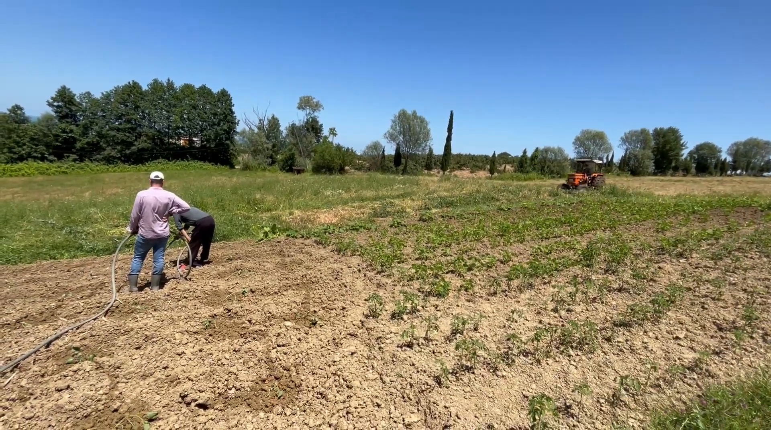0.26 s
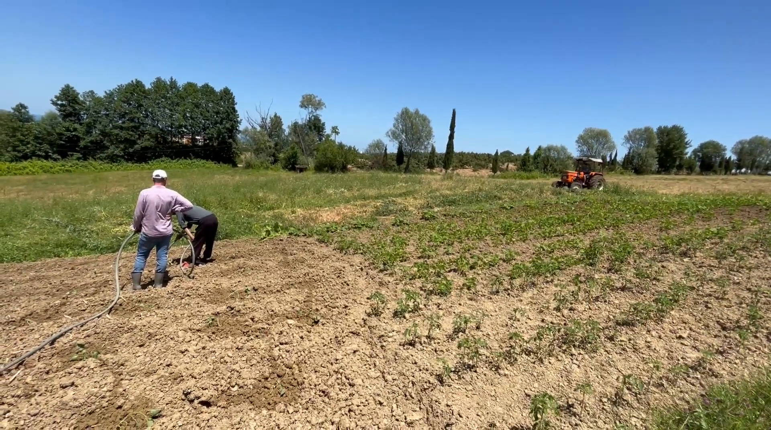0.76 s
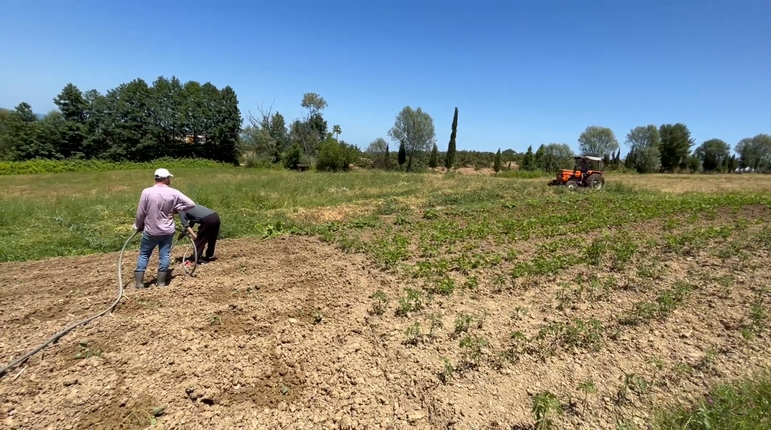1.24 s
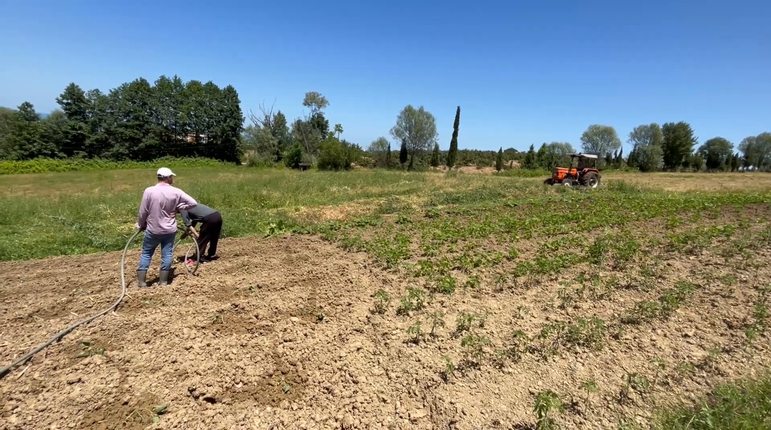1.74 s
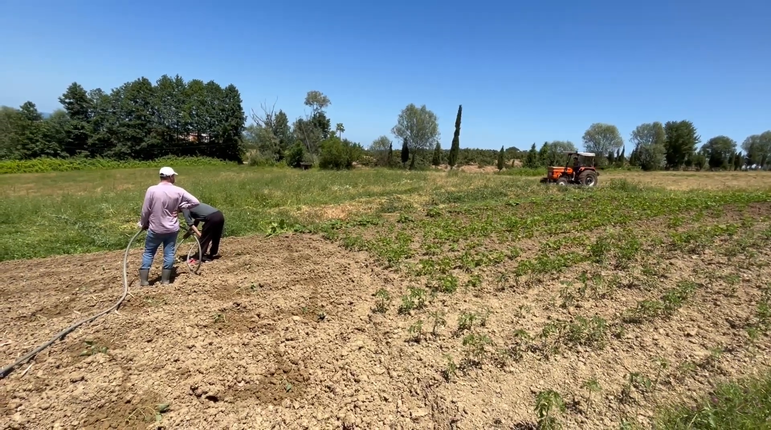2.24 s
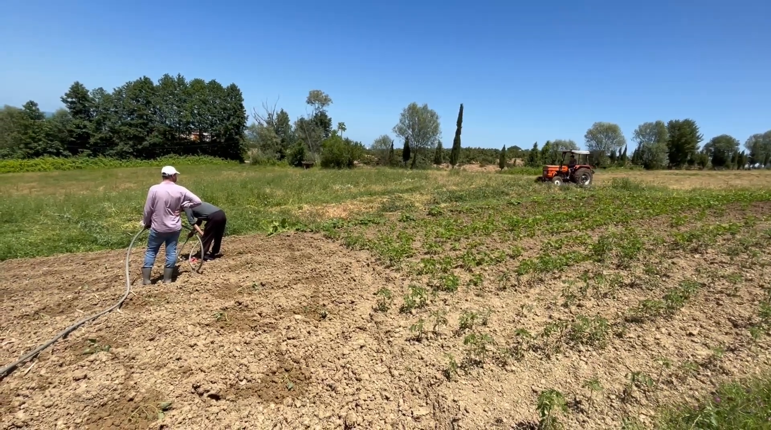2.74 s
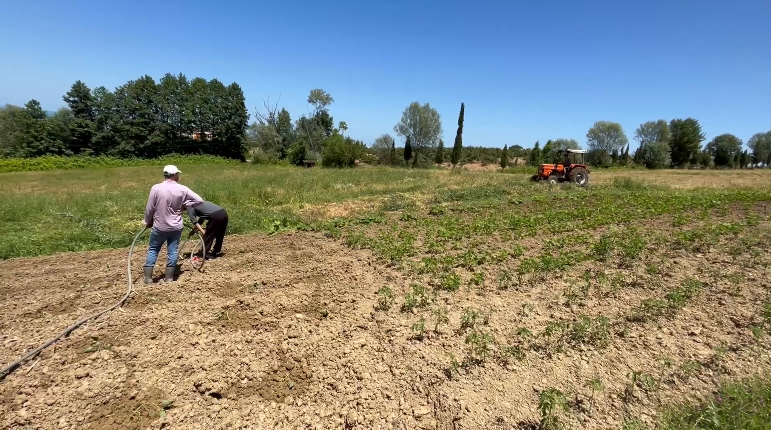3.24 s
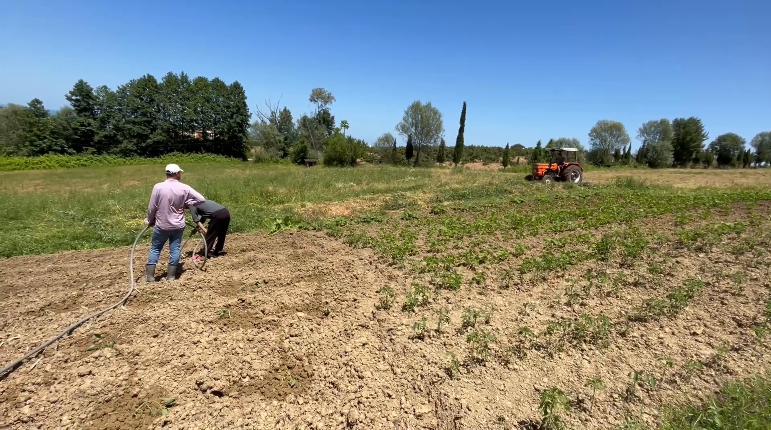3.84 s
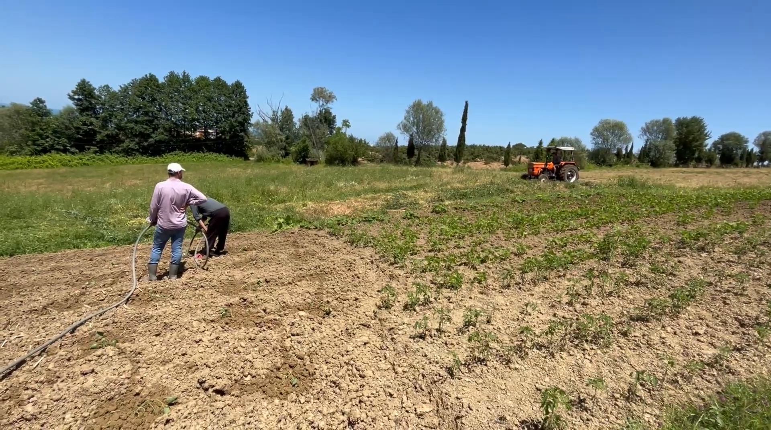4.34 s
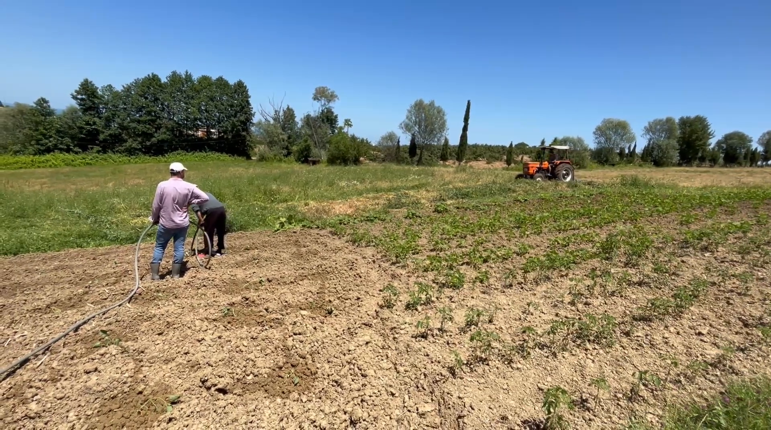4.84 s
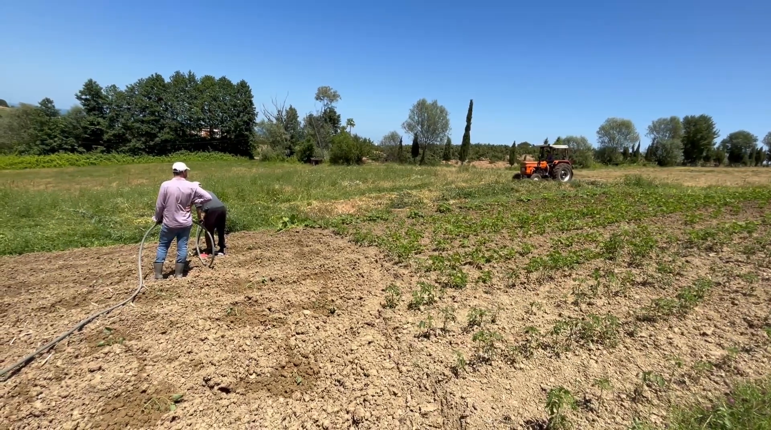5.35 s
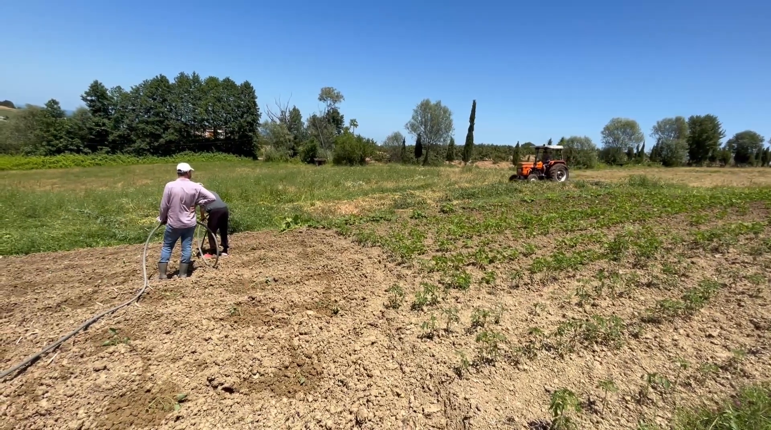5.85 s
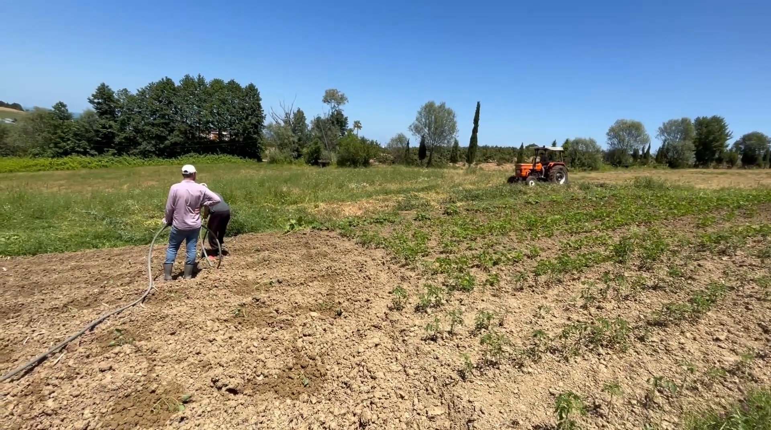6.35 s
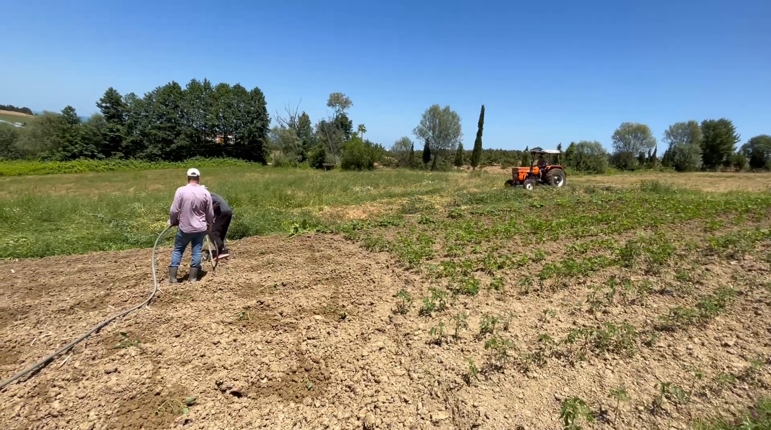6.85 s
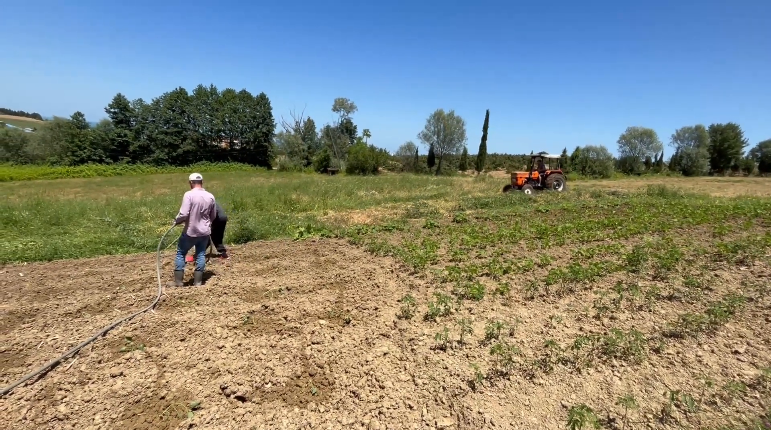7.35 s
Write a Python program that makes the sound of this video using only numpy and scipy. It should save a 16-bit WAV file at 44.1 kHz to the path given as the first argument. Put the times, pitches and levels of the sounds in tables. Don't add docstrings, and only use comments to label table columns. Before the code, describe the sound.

Throughout, a three-cylinder diesel tractor pulls a mower some forty metres away across an open field, heard on a handheld stereo phone. Its fast, even exhaust chug, about 33 beats a second, forms a low drone under a dense, rough mid-range rattle of block and panels, a thin wavering gear whine and faint grass swish; the treble is slightly grainy. From 1.5 to 2.1 s wind gusts thump, low and ragged, mostly on the left. The bass then drops out and returns around 3.6 s. From there small stones knock dully under the mower deck, scattered to the end, while the engine slows slightly and the whine grows stronger in pulls. From 5.3 s gusts buffet again, strongest near 6 s, and the machine works harder. After 6.6 s the bass thins once more, with a few lighter wind bumps, the tractor still running at the end.

```python
import sys
import numpy as np
from scipy import signal
from scipy.fft import rfft, irfft, next_fast_len
from scipy.io import wavfile
from scipy.ndimage import uniform_filter1d, map_coordinates

SR = 44100
rng = np.random.default_rng(int(sys.argv[2]) if len(sys.argv) > 2 else 0)


def invert_db(x):
    u = np.asarray(x, float) / 20
    return 10 ** u


def waveform_to_disk(signal):
    frames = np.transpose(np.atleast_2d(signal))
    scaled = np.clip(frames, -1, 1) * 32767
    samples = np.round(scaled).astype(np.int16)
    wavfile.write(sys.argv[1], SR, samples)


N = 334719
T = np.arange(N) / SR
SIZE = next_fast_len(N)
HZ = np.maximum(np.arange(SIZE // 2 + 1) * SR / SIZE, 1)


def curves(table):
    s, *columns = np.transpose(table)
    return [np.interp(T, s, c) for c in columns]


def over_hz(table):
    hz, *columns = np.transpose(table)
    return [np.interp(np.log(HZ), np.log(hz), c) for c in columns]


def unit(x):
    return x / np.sqrt(np.mean(x ** 2))


def walk(rate_hz):
    k = int(SR / rate_hz)
    steps = np.repeat(rng.standard_normal(N // k + 1), k)
    return unit(uniform_filter1d(uniform_filter1d(steps, k), k)[:N])


def coloured(gain):
    return unit(irfft(gain * rfft(rng.standard_normal(SIZE)), SIZE)[:N])


def swell(start_s, length_s, attack_s, release_s):
    rise = (T - start_s) / attack_s + 1
    fall = 1 - (T - start_s - length_s) / release_s
    return np.clip(np.minimum(rise, fall), 0, 1)


# (start [s], length [s], left level [dB], right level [dB])
GUSTS = [(0.873, 0.12, -57.5, -55), (1.48, 0.26, -43, -52), (1.854, 0.16, -44.5, -38),
         (2.178, 0.17, -46.5, -48), (2.95, 0.3, -70, -54.5), (3.6, 0.17, -55, -54.5),
         (4.743, 0.36, -60, -51), (5.507, 0.36, -44, -46), (5.956, 0.31, -37.5, -41.5),
         (6.493, 0.049, -46, -54), (6.851, 0.068, -42, -52), (7.109, 0.44, -44, -53)]
# (frequency [Hz], level [dB])
RUSH = [(25, -11), (50, -3), (90, 0), (160, -1), (240, -7), (330, -14), (450, -22), (600, -40)]
# (time [s], peak level [dB], pitch [Hz], port [0 left, 1 right])
THUMPS = [(0.926, -22, 126, 1), (1.475, -13, 107, 0), (1.477, -20, 95, 1), (1.493, -13.5, 98, 0),
          (1.534, -12, 114, 0), (1.59, -20, 110.2, 0), (1.655, -20, 130, 0), (1.718, -15.5, 90, 0),
          (1.764, -12, 89, 0), (1.839, -16, 126, 0), (1.865, -15.5, 170.5, 0), (1.903, -22, 151, 0),
          (1.942, -10, 84.5, 0), (5.552, -24, 90.5, 0), (5.624, -15.5, 77.56, 0), (6.006, -19.5, 79.5, 0),
          (6.153, -14.5, 150, 0), (6.168, -15, 90, 0), (6.299, -23, 85, 0), (6.53, -22, 90.6, 0),
          (1.617, -17, 104.9, 0), (1.696, -18, 142, 0), (1.744, -16, 128, 0), (1.82, -15.5, 130, 0),
          (1.853, -18, 113.2, 1), (1.927, -19, 152.2, 1), (1.963, -7, 106, 0), (1.993, -13.5, 126, 0),
          (1.993, -13.5, 133, 1), (2.019, -12, 149, 0), (2.053, -13, 143, 0), (2.107, -19, 189.1, 0),
          (5.279, -14.5, 76, 0), (5.604, -22.5, 112, 0), (5.725, -17, 134, 0), (5.814, -14.5, 99, 0),
          (5.866, -33, 100.5, 0), (5.972, -14.5, 142.6, 0), (6.077, -10, 105, 0), (6.139, -13.5, 141, 0),
          (6.169, -25, 106, 1), (6.243, -16, 92, 0), (6.272, -21, 96, 0), (6.835, -18, 141, 0),
          (7.194, -20.5, 172.1, 0), (7.448, -20, 135, 0), (1.957, -20, 350, 0), (1.985, -25, 400, 0),
          (2.026, -24, 334, 0)]


def wind():
    attack_s, release_s = 0.13, 0.14
    spread_cycles, glide_per_cycle = 0.84, 0.15
    breeze = invert_db(np.array([[-46], [-51.5]]))
    gusts = sum(np.outer(invert_db(np.array(db)), swell(s, length, attack_s, release_s))
                for s, length, *db in GUSTS)
    rush_gain = invert_db(over_hz(RUSH)[0])
    out = np.array([gain * invert_db(4.4 * walk(30) + 0.5) * coloured(rush_gain) for gain in gusts + breeze])
    t = np.arange(-2000, 2000) / SR
    for s, db, hz, port in THUMPS:
        turn, small_turn = rng.random(2)
        puff = np.exp(-.5 * (t * hz / spread_cycles) ** 2)
        burst = np.cos(2 * np.pi * (hz * t * (1 - glide_per_cycle * hz * t) + turn))
        burst += .3 * np.cos(2 * np.pi * (1.9 * hz * t + small_turn))
        i = int(s * SR) - len(t) // 2
        out[port, i:i + len(t)] += invert_db(db - 4.0) * (puff * burst)[:N - i]
    out[1] += .12 * out[0]
    return out


# (start [s], length [s], closing [s], opening [s], depth [dB])
FILTER_SHUT = [
    (0.843, 0.24, 0.092, 0.089, -1),
    (1.2, 0.22, .1, .1, 2),
    (2.065, 1.5, 0.045, 0.32, -12),
    (4.123, 0.31, 0.29, 0.11, -3),
    (4.85, 0.26, 0.27, 0.12, -1.5),
    (5.244, 0.43, .1, .05, 3),
    (5.79, 0.22, 0.13, 0.12, -2.5),
    (6.62, 1.21, 0.17, 0.11, -10),
]


def wind_filter_db():
    return sum(db * swell(s, length, closing, opening) for s, length, closing, opening, db in FILTER_SHUT)


# (frequency [Hz], level [dB], rise as the tractor turns [dB/s])
SHELLS = [(291.8, -52.5, 1), (337.3, -53, -1), (1171, -52, -1.5), (1050, -62, 1.1)]


def shells():
    out = 0
    for hz, db, rise_db_s in SHELLS:
        level_db = db + rise_db_s * (T - T[-1] / 2) + 4.1 * walk(7)
        out = out + invert_db(level_db) * np.sin(2 * np.pi * np.cumsum(hz * (1 + .008 * walk(5))) / SR)
    return out


# (start [s], length [s], gain [dB])
MESH = [
    (3.75, 0.55, 5),
    (4.55, 0.6, 5.5),
    (5.701, .4, 3),
    (6.65, .8, 3.5),
]


def whine():
    level_db, rise_db_s, waver_db, edge_s = -60 + 4.5, .45, 1.8, 0.11
    tone = np.sin(2 * np.pi * np.cumsum(569 + 1.0 * walk(4) + 2.0 * walk(40)) / SR)
    pull_db = sum(db * swell(s, length, edge_s, edge_s) for s, length, db in MESH)
    balance_db = np.array([[.8], [-.8]])
    return invert_db(level_db + rise_db_s * T + pull_db + waver_db * walk(13) + balance_db) * tone


# (time [s], peak level [dB], ring [Hz])
KNOCKS = [(0.999, -27, 825), (1.81, -30.5, 1210), (3.658, -39, 892), (3.714, -33, 942), (3.847, -32, 927),
          (4.045, -26, 1157), (4.475, -26.5, 1130), (5.131, -22, 1162), (5.229, -29, 802),
          (5.312, -29.5, 1050), (5.382, -28, 890), (5.865, -29, 897), (5.907, -26, 1110),
          (6.008, -29, 1030), (6.173, -28, 880), (6.445, -25.5, 813), (6.615, -33.5, 821),
          (7.139, -26, 1500), (7.385, -26, 1063)]


def knocks():
    decay_s = .008
    out, t = np.zeros(N), np.arange(2000) / SR
    for s, db, hz in KNOCKS:
        i = int(s * SR)
        out[i:i + len(t)] += invert_db(db) * np.exp(-t / decay_s) * np.sin(2 * np.pi * hz * t)
    return out


# (time [s], level [dB])
LOAD = [(0, -36), (1.3, -36), (2, -35.5), (2.8, -36), (3.8, -35.5), (4.5, -35), (5.2, -34.5), (5.7, -34.5),
        (5.95, -33.5), (6.4, -34.5), (7.0, -35), (7.59, -34)]
LOAD_SHARES = [0.77, 1.25, 0.077, 1.3]
# (start [s], length [s], load column [index], gain [dB])
LURCHES = [
    (0.7, 0.18, 0, 5.5),
    (1.38, 1.287, 0, -4.5),
    (5.3, 0.1, 0, -3),
    (7.8, 0.2, 0, 4),
    (6.3, 0.59, 0, 2),
    (1.75, 4.8, 2, -1),
    (6.8, 0.53, 2, -5.5),
    (4.2, 0.33, 1, -0.5),
]
# (centre [Hz], load column [index], swing once a cycle [dB], twice [dB],
# each firing [dB], flicker [dB], rise as it turns [dB/s])
PARTS = [(300, 0, .3, .3, .3, 1.5, .1), (500, 1, .3, .3, .3, .5, -.2), (700, 1, .5, .3, .5, .5, .4),
         (900, 1, .6, .2, .4, .5, -.2), (1150, 1, .5, .3, .4, .5, .1), (1550, 1, 1.3, 1.3, .6, .5, .2),
         (2050, 1, .6, .6, .3, .6, -.2), (2900, 2, .5, .2, .8, .8, .2), (4200, 3, .2, .1, .5, .8, 0),
         (6000, 3, .1, .1, .4, .7, 0), (8500, 3, .1, .1, .4, .6, .1), (11500, 3, .1, .1, .3, .8, .4)]
# (frequency [Hz], left level [dB], right level [dB],
# likeness [0-1], right lead [rad])
PORTS = [(247, -10, -11, 1, 0.01), (257, -13, -9, 1, 0.37), (286, 1.5, 1.5, 1, 0.018),
         (314, -5, -4.5, 1, 0.43), (317, -0.5, 1, 1, -0.49), (371, -8.5, -10, 1, -0.6),
         (400, -13.0, -9.5, 0.53, 0.6), (482, -9, -10.5, 0.85, -1), (520, -13, -11.5, 0.34, -1.7),
         (552, -7.5, -13.5, 0.73, 0.0), (579, -9.0, -10.5, 1, -0.27), (612, -14, -8, 0.36, -3.7),
         (636, -3.5, -12.5, 0.2, 1.2), (717, -1, -12, 0.8, 0.5), (764, -7.5, -9.0, 0.92, 0.82),
         (873, 1, -3.5, 0.87, 0.84), (996, -8, -8.0, 1, 1.44), (1050, -4, -5.5, 0.79, 0.6),
         (1130, -6, -4, 0.88, 0.45), (1177, -2, -6, 0.95, 0.15),
         (1290, -8.0, -10.5, 0.93, 0.6), (1405, -10.5, -14, 0.5, 1.7), (1500, -1.5, -9.5, 0.83, 1.7),
          (1638, -6.5, -9.5, 0.77, 1.8), (1772, -12, -15.5, 0.3, -0.2), (1856, -9.5, -11.5, 0.4, -0.8),
          (1877, -11.5, -9.5, 0.5, -2), (2130, -16.0, -14.5, 0.1, -1), (2185, -13, -7, 0.6, 1.2),
          (2325, -16.5, -15, 0.72, 3), (2400, -21.5, -28, 1, 3.5), (2520, -11, -13, 0.88, 3),
          (2630, -15, -14.5, 0.85, 0.9), (2906, -11.0, -8.5, 1, -1), (3210, -15.5, -19, 0.73, -2),
         (3540, -18.5, -15.5, 0.5, -2.5), (4080, -21, -21.5, 0.35, -6), (4580, -23, -26.5, 1, -5),
       (5400, -22, -25, 0.5, -6), (5790, -21.5, -25.5, 0.98, -3), (6250, -27, -24.0, 0, -2),
       (6670, -31.5, -26, 0.6, -5.5), (7000, -32.0, -37, 0.14, -6.5), (7800, -36.5, -37, 0.33, -5),
       (8800, -33, -33.5, 0.5, -9), (9430, -36.5, -30, 0.16, -7), (10720, -42, -39, 1, -11),
       (11200, -41.5, -36.5, 0.8, -6.5), (11300, -36, -34.5, 0.95, -4.5), (11700, -43, -42, 0.9, -6.5)]
# (time [s], right port delay [samples])
DRIFT = [(0, 0.054), (3.8, -0.55), (7.59, 0.71)]


def rattle(cycle):
    level_db, lurch_edge_s = -35.5 + 2.0, 0.13
    effort_db = curves(LOAD)[0]
    load_db = [share * (effort_db - effort_db.mean()) for share in LOAD_SHARES]
    for s, length, column, db in LURCHES:
        load_db[column] += db * swell(s, length, lurch_edge_s, lurch_edge_s)
    centres = np.log([part[0] for part in PARTS])
    direct = scattered = 0
    bump = walk(3.72)
    for k, (_, column, once_db, twice_db, firing_db, flicker_db, rise_db_s) in enumerate(PARTS):
        beat_db = .7 * once_db * np.cos(cycle) + .6 * twice_db * np.cos(2 * cycle)
        beat_db += 1.0 * firing_db * (np.cos(3 * cycle) + 0.22 * np.cos(6 * cycle))
        chance_db = .3 * bump + 1.6 * flicker_db * walk(9) + .5 * walk(25)
        shake = invert_db(load_db[column] + beat_db + rise_db_s * (T - T[-1] / 2) + chance_db)
        share = np.sqrt(np.interp(np.log(HZ), centres, np.arange(len(PARTS)) == k))
        direct = direct + share * rfft(shake * rng.standard_normal(N), SIZE)
        scattered = scattered + share * rfft(shake * rng.standard_normal(N), SIZE)
    left_db, right_db, alike, lead_rad = over_hz(PORTS)
    alike = np.clip(alike, 0, 1)
    right = alike * np.exp(1j * lead_rad) * direct + np.sqrt(1 - alike ** 2) * scattered
    edges = 1 / (1 + (140 / HZ) ** 6) / (1 + (HZ / 11900) ** 60)
    edges *= 1 + 0.48 * HZ / (HZ + 3000)
    spectra = edges * np.array([invert_db(left_db) * direct, invert_db(right_db) * right])
    left, right = irfft(spectra, SIZE)[:, :N]
    right = map_coordinates(right, [np.arange(N) - curves(DRIFT)[0]], mode="mirror")
    return invert_db(level_db) * unit(np.array([left, right]))


# (time [s], firing rate [Hz])
ENGINE = [(0, 33.77), (.33, 33.62), (.8, 34.7), (1.3, 33.8), (2.2, 33.25), (2.5, 32.76), (3.2, 33.2),
          (3.7, 32.47), (4.2, 33.24), (4.55, 31.8), (5.15, 32.4), (5.4, 31.34), (5.9, 32.18), (6.2, 32.2),
          (6.6, 31.67), (7.15, 32.2), (7.59, 32.1)]


def engine_cycle():
    return 2 * np.pi * np.cumsum(curves(ENGINE)[0]) / 3 / SR


# (multiple of the four-stroke cycle [1], level re 2nd tone [dB])
ORDERS_OF_CYCLE = [(3, -15), (4, -22), (5, -19), (7, -17), (8, -20), (10, -22), (12, -23)]
# (frequency [Hz], level [dB])
RUMBLE = [(20, -31), (35, -4.5), (60, 11), (100, -21), (130, 6.5), (200, -50)]


def exhaust(cycle, cut_db):
    second_db = -35 + cut_db + 1.3 * walk(4.41)
    third_db = -39.3 + .92 * cut_db + 1.3 * walk(3.44)
    tones = invert_db(second_db + 3 + 1.0 * walk(9)) * np.sin(6 * cycle + .25 * walk(7))
    tones += invert_db(third_db + 3 + 1.2 * walk(9)) * np.sin(9 * cycle + 1.5 + .25 * walk(7))
    for order, db in ORDERS_OF_CYCLE:
        tones += invert_db(second_db + db + 3.0 * walk(3)) * np.sin(order * cycle + .9 * walk(3))
    open_db = uniform_filter1d(second_db, SR // 8)
    rumble_gain = invert_db(over_hz(RUMBLE)[0])
    common, *own = [invert_db(open_db + db - 0.5 + 2.0 * walk(6.7)) * coloured(rumble_gain)
                    for db in (-13, -6, -10)]
    balance = invert_db(np.array([[1.2], [0.]]))
    return tones * balance + common + np.array(own)


def scene():
    cycle = engine_cycle()
    return wind() + shells() + whine() + knocks() + rattle(cycle) + exhaust(cycle, wind_filter_db())


# (frequency [Hz], mid level [dB], side level [dB])
FINENESS = [(300, 26, 18), (1290, 18, 14), (1640, 18, 18), (1980, 11, 14), (2200, 11, 10), (2450, 1, 10),
            (2710, 10, 3), (2970, 12, 8), (3270, 3, 9), (3620, 4, 5), (4000, 4, -3), (4440, 2, -1),
            (4900, 4, 5), (5430, 4, 8), (5990, -1, 4), (6590, 0, -5), (7230, -5.5, -5), (7920, -4.5, -7.5),
            (8610, -3, 0), (9300, 1, 1), (9990, 0, 3), (10680, -6.5, 0), (11370, -2.5, -9),
            (12050, -19, -40)]


def rounded(dry):
    hop, lead = 1024, 2048 - 280
    swing_db, bass_cost = 6.0, .1
    band_edges = [*range(0, 40, 4), *range(40, 96, 8), 96, 108, 120, 132, 144, 160, 176, 196,
                  216, 240, 264, 292, *range(320, 1024, 32)]
    pair = np.array([dry[0] + dry[1], dry[0] - dry[1]]) / 2
    pair = np.pad(pair, ((0, 0), (lead, 3 * hop)))
    count = pair.shape[1] // hop - 1
    basis = np.cos(np.pi / hop * np.outer(np.arange(2 * hop) + .5 + hop / 2, np.arange(hop) + .5))
    basis *= signal.windows.kaiser_bessel_derived(2 * hop, 4 * np.pi)[:, None] * np.sqrt(2 / hop)
    lines = pair[:, np.arange(count)[:, None] * hop + np.arange(2 * hop)] @ basis
    band = np.searchsorted(band_edges, np.arange(hop), "right") - 1
    centre = (np.bincount(band, np.arange(hop)) / np.bincount(band)).astype(int)
    nearby = np.sqrt(uniform_filter1d(np.mean(lines ** 2, axis=(0, 1)), size=30))[centre]
    bass_power = np.mean(lines[:, :, 2:12] ** 2, axis=(0, 2))
    bass_db = 10 * np.log10(uniform_filter1d(bass_power, size=5) + 1e-12)
    chance = unit(uniform_filter1d(rng.standard_normal((2, count, len(centre))), size=3, axis=1))
    hz, *fine_db = np.transpose(FINENESS)
    step_db = swing_db * chance + bass_cost * (bass_db - np.median(bass_db))[:, None]
    step_db -= np.array([np.interp(centre * SR / 2 / hop, hz, db) for db in fine_db])[:, None]
    step = (nearby * invert_db(step_db) + 1e-12)[:, :, band]
    whole = np.floor(np.abs(lines / step) ** .75 + .4054)
    frames = (np.sign(lines) * step * whole ** (4 / 3)) @ basis.T
    lapped = (frames[:, 1:, :hop] + frames[:, :-1, hop:]).reshape(2, -1)
    mid, side = lapped[:, lead - hop:lead - hop + N]
    return np.array([mid + side, mid - side])


def roll_off(x):
    return signal.sosfilt(signal.butter(12, 12130, fs=SR, output="sos"), x)


def record(dry):
    mix = rounded(dry)
    return roll_off(mix)


dry = scene()
out = record(dry)
waveform_to_disk(out)
```